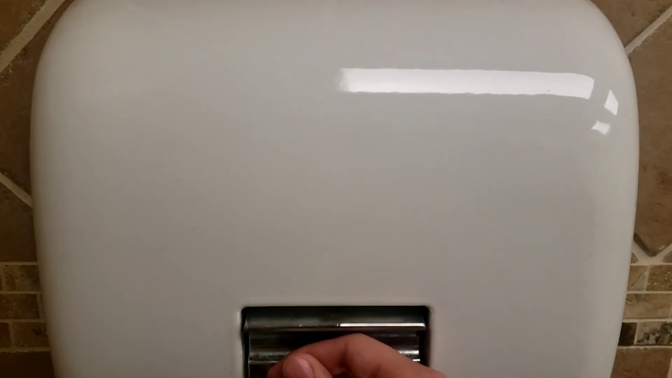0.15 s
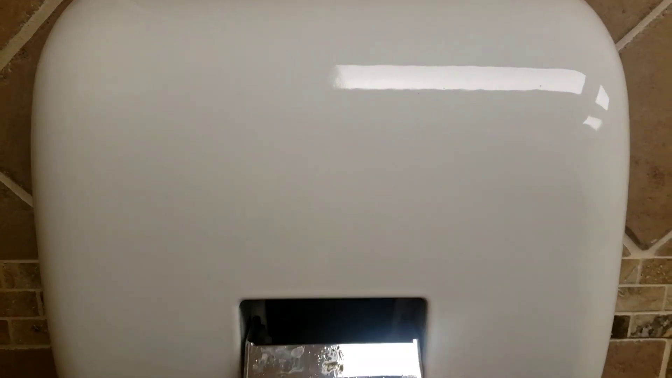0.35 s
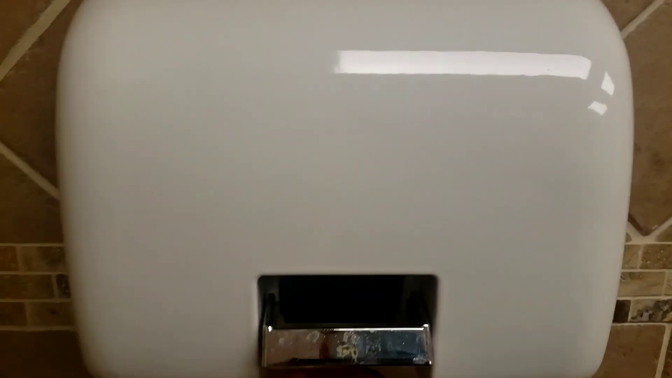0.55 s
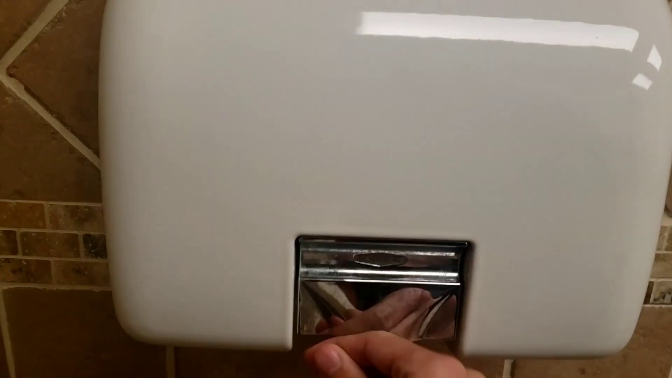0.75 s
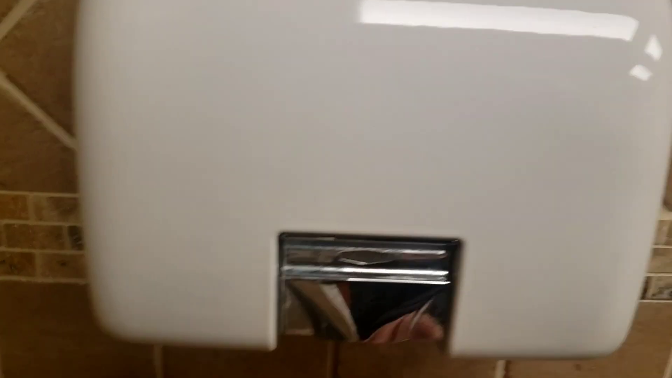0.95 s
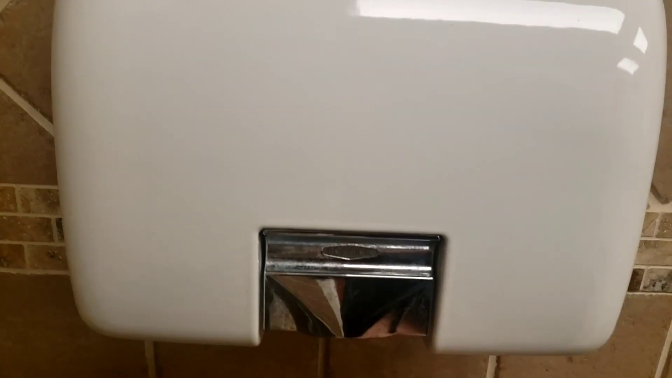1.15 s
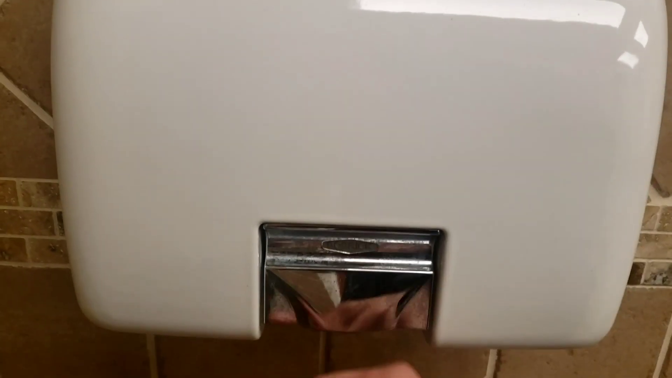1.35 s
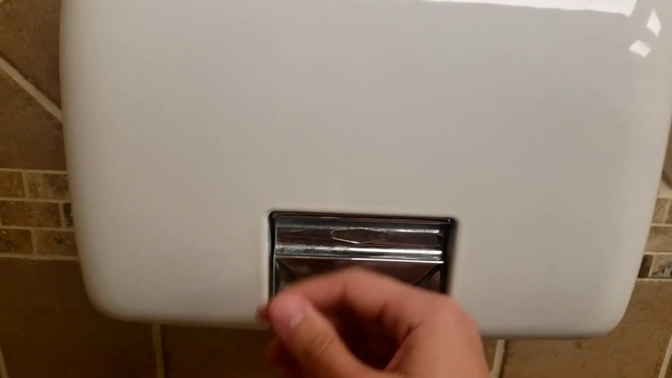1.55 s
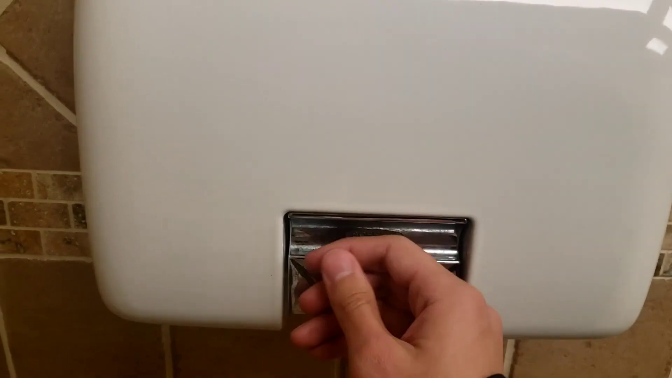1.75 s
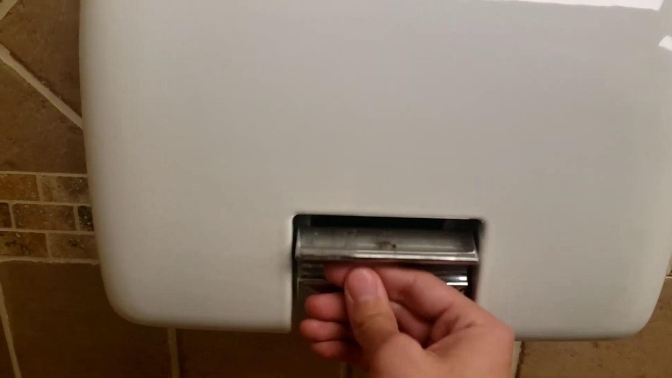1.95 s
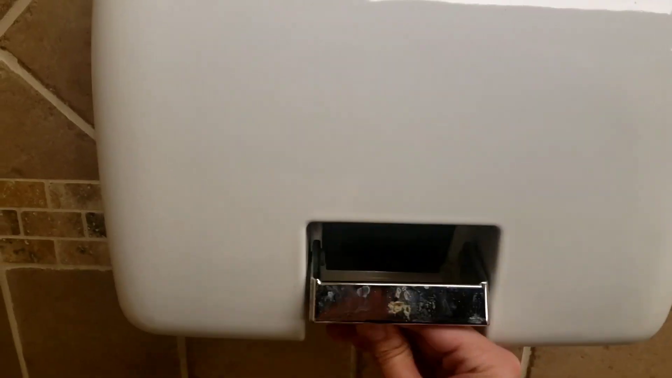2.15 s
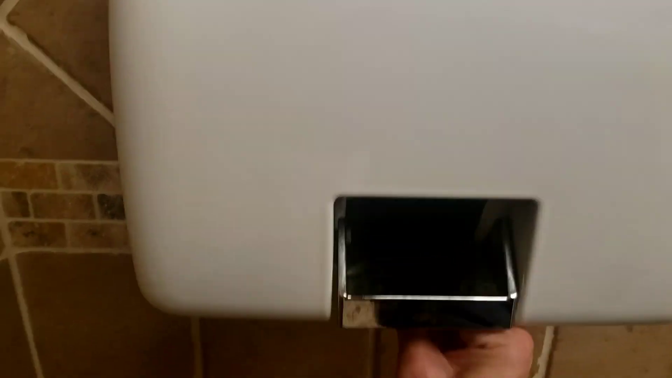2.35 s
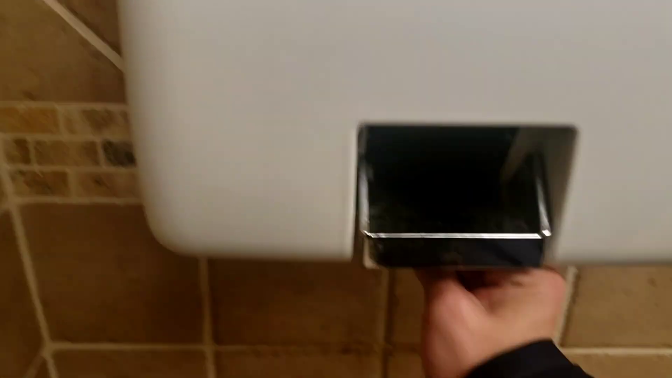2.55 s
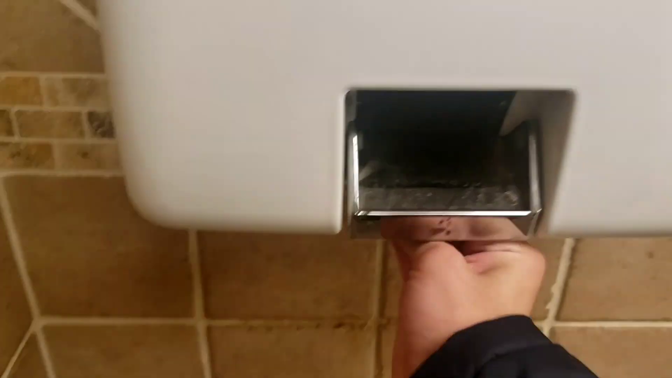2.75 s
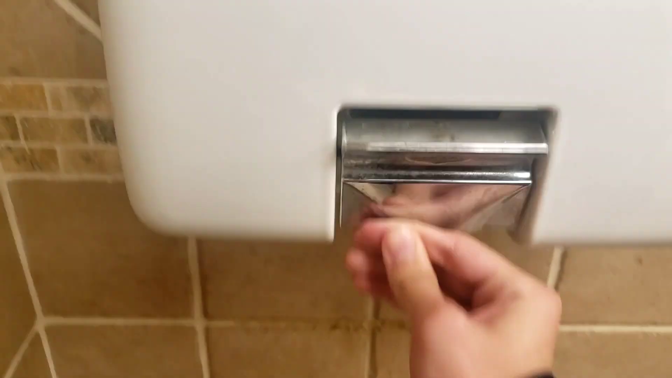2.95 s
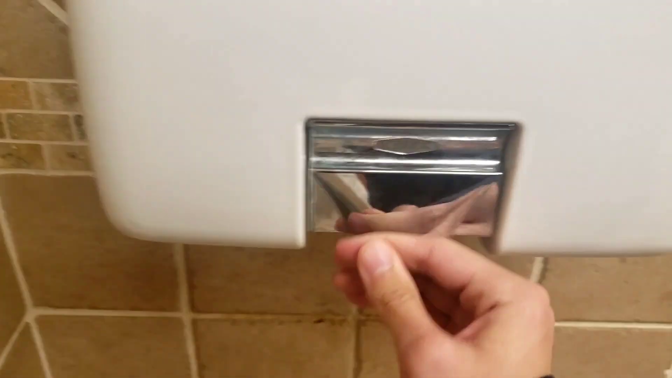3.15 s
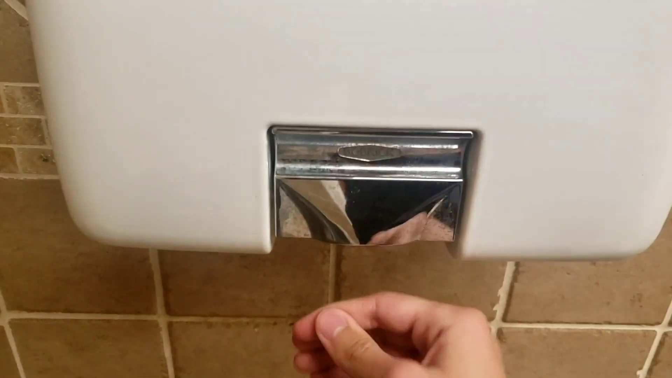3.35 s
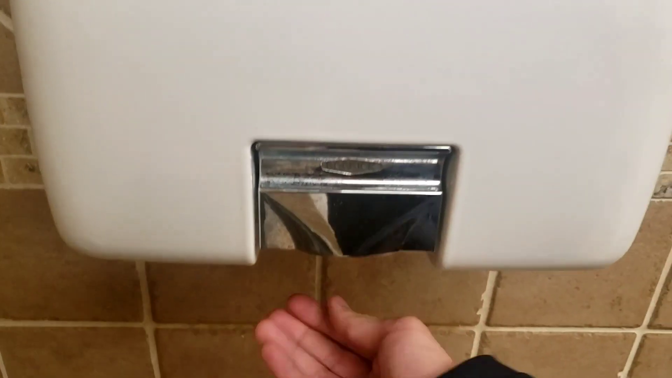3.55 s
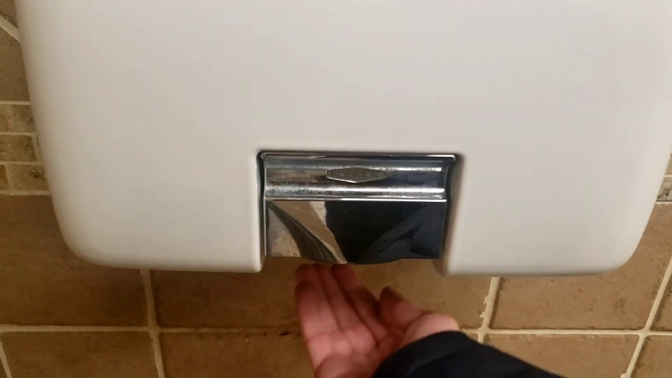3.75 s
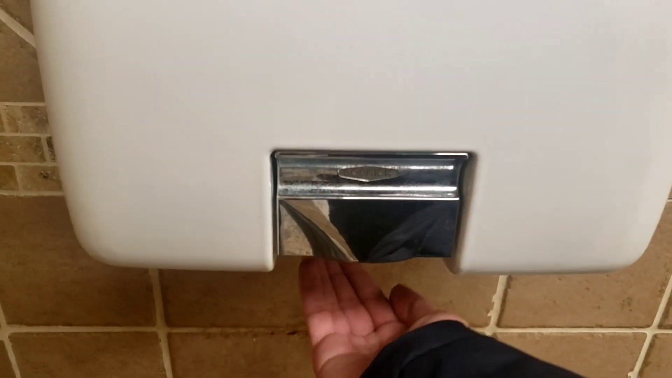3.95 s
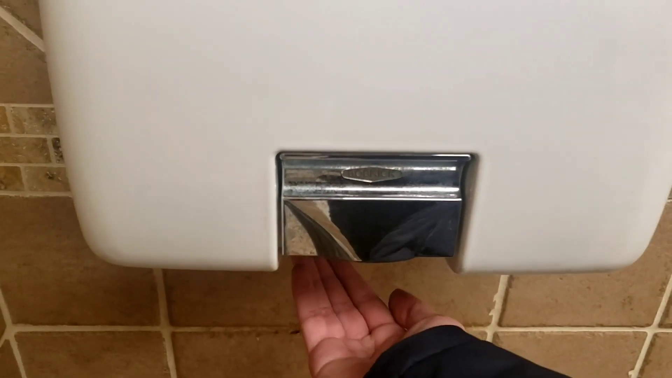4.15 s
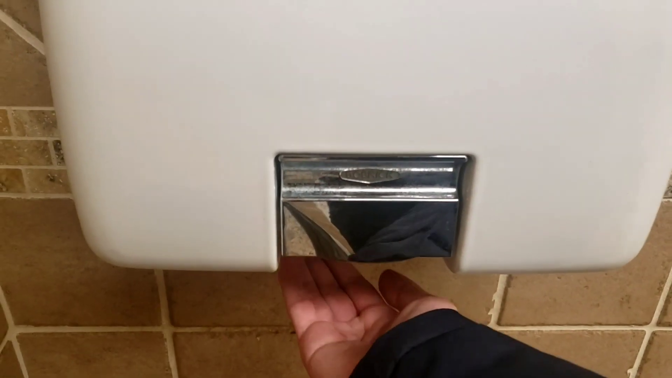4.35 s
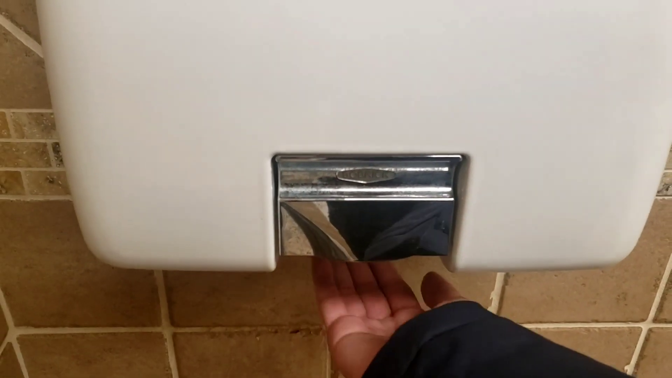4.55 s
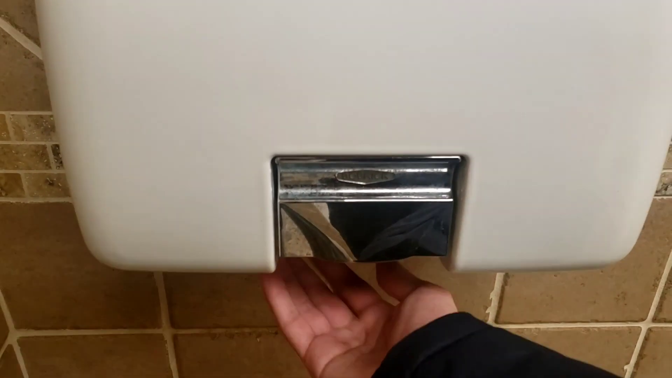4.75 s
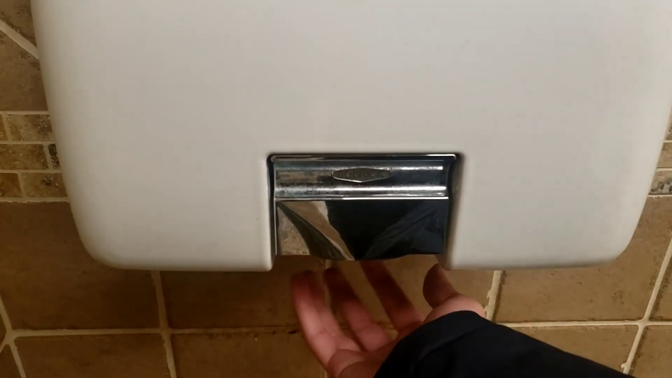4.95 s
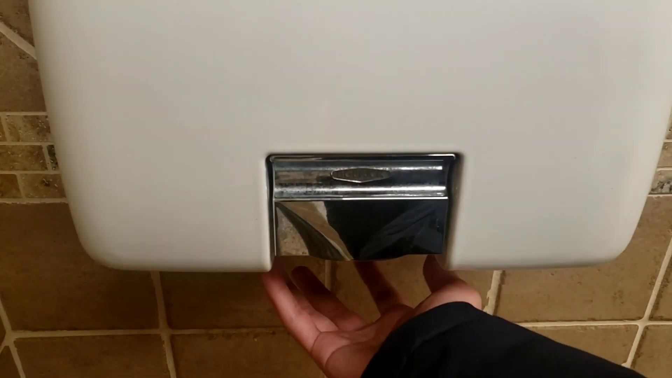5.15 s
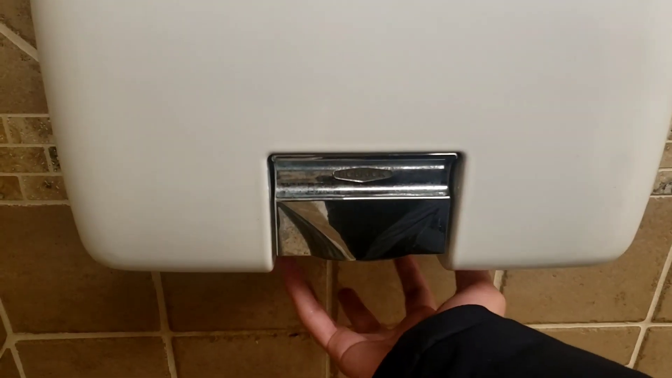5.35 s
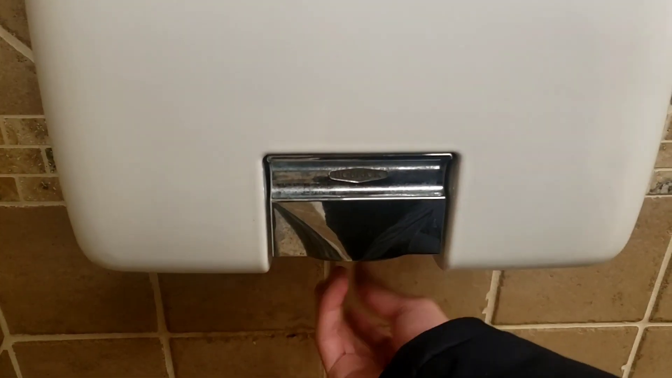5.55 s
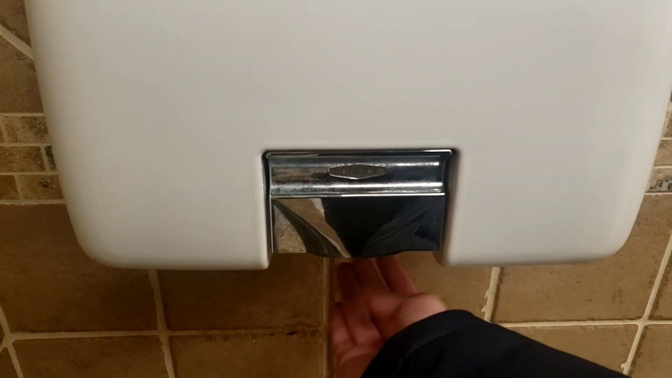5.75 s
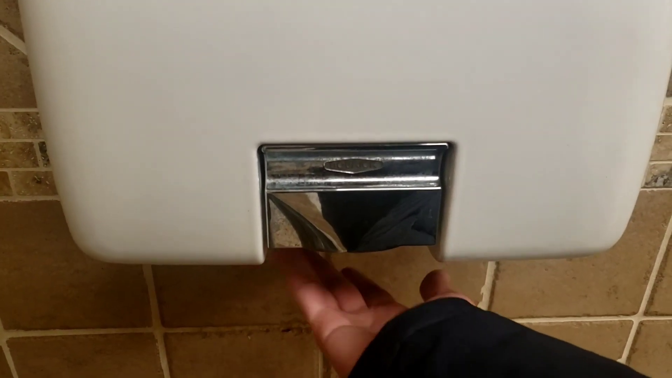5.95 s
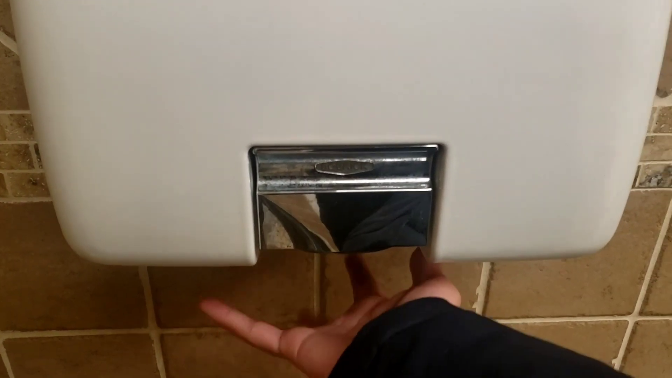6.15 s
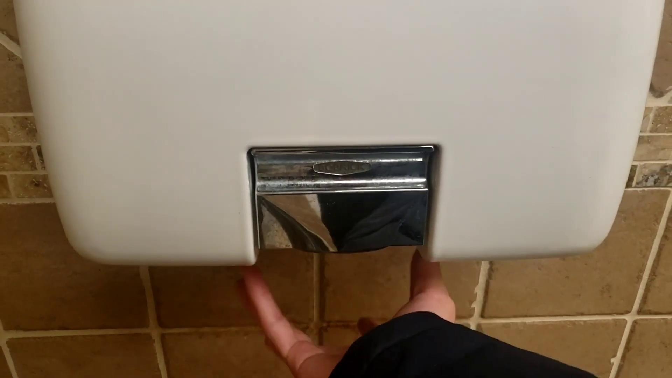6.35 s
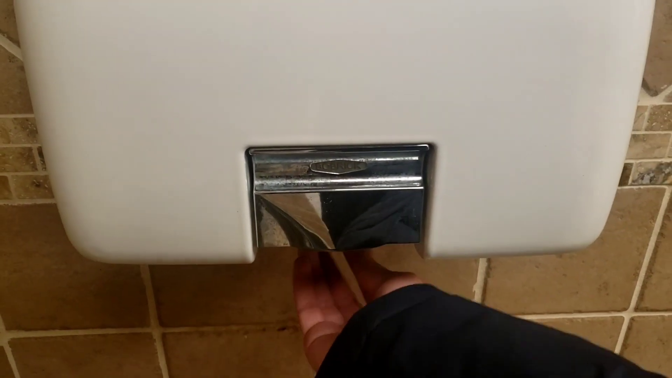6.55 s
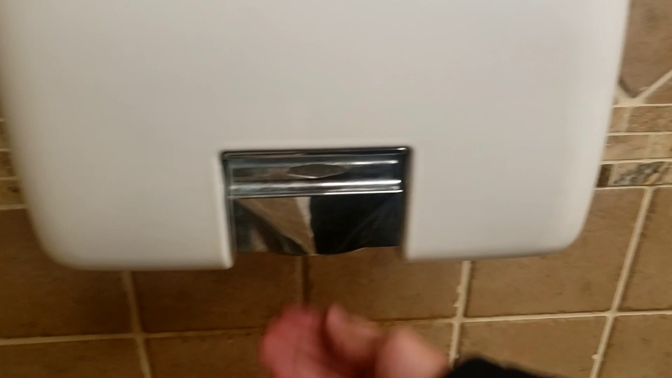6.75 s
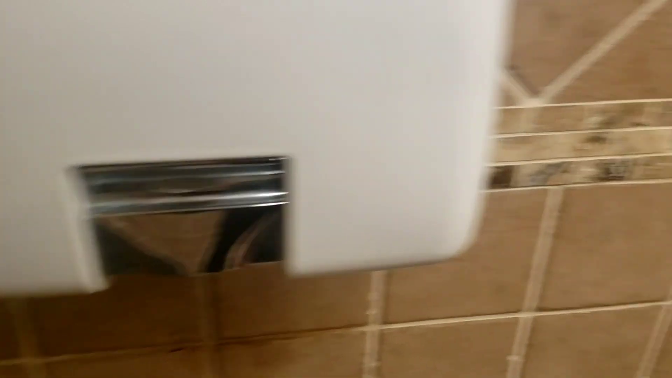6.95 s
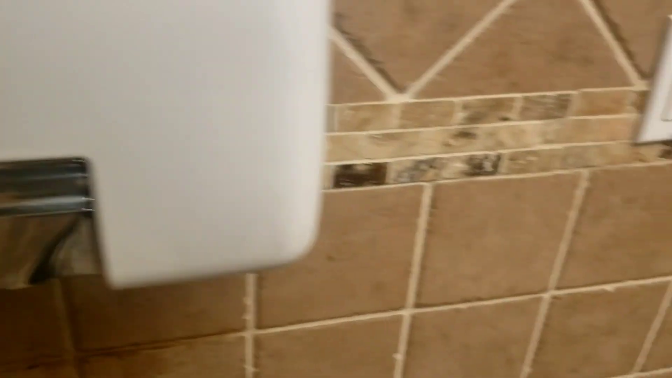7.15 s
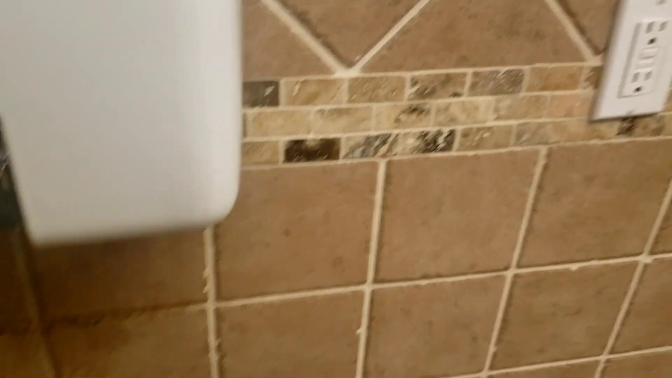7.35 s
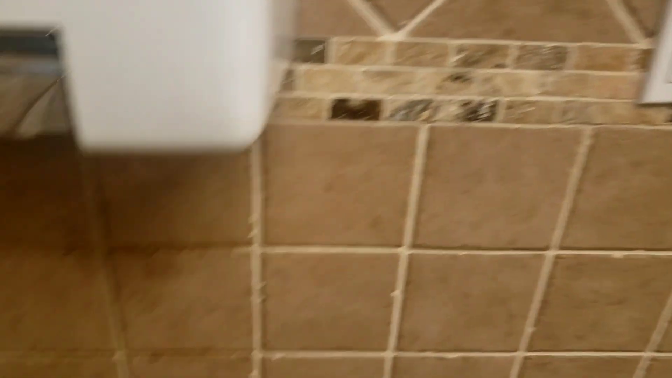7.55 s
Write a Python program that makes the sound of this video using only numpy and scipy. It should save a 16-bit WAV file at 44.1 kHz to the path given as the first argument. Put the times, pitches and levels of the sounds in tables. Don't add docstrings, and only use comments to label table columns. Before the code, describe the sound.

Close to a wall dryer in a small tiled restroom, a hand rubs and thumps the hollow cover. A dry hinge chirps, a metal flap slams and rings briefly, then lighter ticks and a clack follow. The motor starts with a growling hum, the fan climbs quickly, and a loud broad air roar holds, slightly changed as a hand enters the jet.

```python
import sys
import numpy as np
from scipy import signal
from scipy.fft import rfft, irfft, next_fast_len
from scipy.io import wavfile
from scipy.ndimage import map_coordinates

SR = 44100
rng = np.random.default_rng(int(sys.argv[2]) if len(sys.argv) > 2 else 0)


def level_to_linear(level):
    exponent = np.asarray(level, float) / 20
    return 10 ** exponent


def dump(signal):
    limited = np.clip(np.atleast_2d(signal).T, -1, 1)
    pcm = np.round(limited * 32767).astype(np.int16)
    wavfile.write(sys.argv[1], SR, pcm)


N = 335601
TIME = np.arange(N) / SR

MOTOR_ON_S, GRIP_S = 2.654, 2.659
# t/s, level/dB, rattle/s, clatter t60/s, brightness per range/dB
BLOWS = [
    (0.5198, -55.5, .012, 0.17, 9.5),
    (0.661, -67, 0.027, 0.055, -9.5),
    (0.8703, -29.5, 0.025, 0.14, 2.2),
    (1.487, -72.5, 0.033, 0.12, -0.5),
    (2.2174, -60.5, 0.0065, 0.093, 11.5),
    (2.3577, -42.5, 0.0067, 0.15, 8),
    (2.427, -62, 0.034, 0.14, -12.5),
    (2.657, -73.5, 0.0067, 0.056, 9),
    (3.224, -41.5, 0.0074, 0.12, -3),
]
# f/Hz, left over right/dB
FLAP_LEAN = [(60, 1), (110, 3), (200, -1), (380, -2), (700, 1.5), (1290, 5), (2380, 1.5), (4400, 6),
             (8120, 2), (15000, 9)]
# f/Hz, left over right/dB
BLOWER_LEAN = [(60, 2), (250, -0.5), (310, 0.5), (420, 3), (500, -17), (600, 0), (800, -1.5), (950, 4.5),
               (1300, 5), (1800, 3), (3000, 4), (4300, 3.5), (7000, 10.5), (14000, 11.5)]


def in_time(rows):
    s, *columns = np.transpose(rows)
    return [np.interp(TIME, s, c) for c in columns]


def at_hz(points, hz):
    return np.interp(np.log(hz), np.log(np.array(points)[:, 0]), np.array(points)[:, 1])


def sides(lean, hz):
    left = level_to_linear(at_hz(lean, hz))
    return np.array([2 * left, 2 + 0 * left]) / (1 + left)


def drift(rate):
    knots = rng.standard_normal(400)
    return map_coordinates(knots, [TIME * rate % 399], order=3)


def fade(start, t60):
    return (TIME >= start) * level_to_linear(-60 * np.maximum(TIME - start, 0) / t60)


def stroke(start, rise, hold, t60):
    attack = (TIME >= start) * (1 - fade(start, rise))
    return attack * np.where(TIME < start + hold, 1, fade(start + hold, t60))


def ranges(spectrum, edges, lean, modes=()):
    # f/Hz, likeness 0-1
    likeness = [(30, .5), (60, .88), (90, .97), (350, .96), (400, .7), (460, .9), (540, .5), (700, .85),
                (1000, .85), (1400, .65), (2000, .35), (2700, .4), (3200, .15), (9000, .1)]
    # f/Hz, phase/rad
    lead = [(200, 0), (380, .6), (500, .35), (700, .5), (900, 1.3), (1200, 1.0), (1500, .2), (1800, -2.5),
            (2150, .2), (2900, .8), (3500, 1.8)]
    size = next_fast_len(N)
    hz = np.maximum(np.fft.rfftfreq(size, 1 / SR), 1)
    peaks_db = sum(db / (1 + (2 * (hz - f) / width) ** 2) for f, width, db in modes)
    shape_db = at_hz(spectrum[:-1], hz) + peaks_db
    alike = np.clip(at_hz(likeness, hz), 0, 1)
    mid, side = rfft(rng.standard_normal((2, size)))
    pair = np.sqrt(1 + alike) * mid + np.sqrt(1 - alike) * side * [[1], [-1]]
    pair = pair * level_to_linear(shape_db) * sides(lean, hz)
    pair = pair * np.exp(.5j * at_hz(lead, hz) * [[1], [-1]])
    below = [0] + [1 / (1 + (hz / edge) ** 12) for edge in edges] + [1]
    layers = []
    for lower, upper in zip(below, below[1:]):
        layers.append(irfft(pair * np.sqrt(upper - lower), size)[:, :N])
    return [x / np.std(x.mean(axis=0)) for x in layers]


def ring(clicks, hz, t60):
    r, w = level_to_linear(-60 / (t60 * SR)), 2 * np.pi * hz / SR
    return signal.lfilter([0, np.sin(w)], [1, -2 * r * np.cos(w), r * r], clicks + 1e-18)


def tiles(x, wet_db):
    tail = rng.standard_normal((2, SR // 2)) * fade(0.028, 0.27)[:SR // 2]
    tail /= np.sqrt(np.sum(tail ** 2, axis=1, keepdims=True))
    return x + level_to_linear(wet_db) * signal.fftconvolve(x, tail, axes=1)[:, :N]


def fan_speed():
    run_up_s, knee = 0.86, 16
    x = np.maximum(TIME - MOTOR_ON_S, 0) / run_up_s
    return x / (1 + x ** knee) ** (1 / knee)


def blower():
    # f/Hz, level per Hz/dB
    air_colour = [(15, -63), (25, -24.5), (81, -15.5), (194, -6), (233, 0.5), (357, -3.5), (532, -13),
                  (906, -13), (981, -14), (1500, -18), (1860, -27), (2070, -26.5), (9410, -29.5),
                  (11600, -28.5), (14400, -30)]
    edges_hz = [135, 650, 1800]
    modes_hz = [94, 120, 148, 171, 238, 305, 357, 440, 477, 600, 666, 763, 960, 1012, 1150, 1302, 1465,
                1580, 2083, 2362, 4000, 7300, 9300]
    # width/Hz, level/dB
    mode_shapes = [(9.03, 11.5), (7.5, 4), (6.85, 1.5), (8.9, 6.5), (25, 6), (12.1, 4.5), (32.8, 8),
                   (20.8, 7), (17.6, 8), (25, 1.5), (27.778, 1.5), (18, 5.5), (36.8, 7.5), (37.8, 7.5),
                   (41.667, 7), (39.9, 6.5), (35, 3), (37.037, 0), (32.2, 6), (25, 1), (454, 2.5), (700, 4),
                   (1620, -3.5)]
    air_layers = [
        (-41.5, 0.52, 8, -5.5, 2.5),
        (-21, 1.44, -2.5, -1.5, 1.5),
        (-32.5, 1.17, 2, -5, -0.03),
        (-29, 1.015, 0.25, -0.5, 0.27),
    ]
    # t/s, share blocked 0-1
    hand_in_jet = [
        (3.45, 0.14),
        (3.72, .99),
        (4.4, 1),
        (4.8, 0.67),
        (5.4, 0.72),
        (6.0, 0.48),
        (6.6, 0.83),
        (7.0, 0.7),
    ]
    modes = [(hz, *shape) for hz, shape in zip(modes_hz, mode_shapes)]
    layers = ranges(air_colour, edges_hz, BLOWER_LEAN, modes)
    speed, blocked = fan_speed(), in_time(hand_in_jet)[0]
    away = np.clip((TIME - 6.78) / 0.39, 0, 1)
    air = 0
    for x, (db, power, hand_db, away_db, flutter_db) in zip(layers, air_layers):
        level_db = db + hand_db * blocked + away_db * away + flutter_db * drift(15.0)
        air = air + x * speed ** power * level_to_linear(level_db)
    return air


def growl():
    # f/Hz, level per Hz/dB
    growl_colour = [(280, -38), (350, 6), (390, 11), (480, 9), (570, 6), (640, -5), (800, -13), (1450, -15),
                    (1800, -40), (2100, -80), (2200, -80)]
    shake = level_to_linear(-42) * stroke(GRIP_S, rise=.12, hold=.24, t60=.6)
    jolt = level_to_linear(-36) * stroke(2.685, rise=0.035, hold=0, t60=0.41)
    return ranges(growl_colour, [], BLOWER_LEAN)[0] * (shake + jolt)


def hum():
    hum_orders = [(1, 3.5, -8.5), (1.452, -3, 3.5), (2.002, -4, 4.5), (3.098, -17, 1), (3.999, -8, 0),
                  (4.75, -2, -4)]
    hum_hz = 120.85
    running = np.clip((TIME - 2.75) / .45, 0, 1)
    tone = 0
    for multiple, start_db, run_db in hum_orders:
        level_db = start_db + (run_db - start_db) * running + 2.7 * drift(22.0)
        phase = 2 * np.pi * multiple * hum_hz * TIME + 0.34 * multiple * drift(25.0)
        tone = tone + level_to_linear(level_db) * np.sin(phase)
    inrush = level_to_linear(-41) * stroke(GRIP_S, rise=0.5, hold=0, t60=5.3)
    load = level_to_linear(-45.5) * np.clip((TIME - MOTOR_ON_S) / 1.34, 0, 1) ** 2
    return np.sqrt(2) * (inrush + load) * tone


def clatter():
    # f/Hz, level per Hz/dB
    slam_colour = [(150, -46.5), (250, -19), (296, -24.5), (339, 2.5), (389, -29.5), (453, 0.5), (753, -27),
                   (988, -0.5), (1560, -18), (2310, -2.5), (3240, -16.5), (5480, -18), (14400, -25)]
    # f/Hz, level per Hz/dB
    clack_colour = [(150, -30.5), (250, -11), (669, -13.5), (1060, -0.5), (1530, -19), (2010, -1),
                    (2870, -7), (3180, -7.5), (4470, -17), (6380, -6), (8510, -17.5), (11400, 3.5),
                    (14400, -8)]
    edges_hz = [1200, 3500, 8000]
    room_t60_s = [0.27, 0.43, 0.47, 0.18]
    out, hardest = 0, max(row[1] for row in BLOWS)
    for spectrum, shut, tail_db in ((slam_colour, True, -2.5), (clack_colour, False, -14.5)):
        for k, x in enumerate(ranges(spectrum, edges_hz, FLAP_LEAN)):
            shape = 0
            for s, level_db, rattle, t60, bright_db in BLOWS:
                if shut != (level_db == hardest):
                    continue
                tilt_db = bright_db * (k - 1.5)
                direct = (TIME >= s) * (TIME < s + rattle) + fade(s + rattle, t60)
                crack = level_to_linear(7 + min(bright_db, 0)) * fade(s, 0.012)
                direct = direct + (k > 0) * crack
                tail = (1 - fade(s, 0.12)) * fade(s, room_t60_s[k])
                shape = shape + level_to_linear(level_db + tilt_db) * (direct + level_to_linear(tail_db - .4 * tilt_db) * tail)
            out = out + x * shape
    return out


def flap():
    # f/Hz, level/dB, t60/s
    shut_modes = [(450, -14, .2), (1040, 2.5, 0.13), (1700, -16, 0.25), (1303, -4.5, 0.1),
                  (2410, -12.5, .1), (2640, -11, .1), (2920, -14, .15), (4100, -15, .15), (5370, -3.5, .1),
                  (5800, -14.5, .1), (6110, -4.5, .1), (6050, -7.5, .1), (8200, -13.5, .25),
                  (10050, -12.5, .15)]
    # f/Hz, level/dB, t60/s
    open_modes = [(866, -6.5, 0.13), (1090, -5, .1), (1301, -8.5, 0.123), (2005, 1.5, .1), (2385, -8, 0.1),
                  (2740, -13, .1), (2890, -5, 0.2), (3520, -4.5, .06), (4160, -3, 0.04), (6330, -14.5, .06)]
    # f/Hz, level/dB, t60/s
    long_rings = [(1640, -69.5, 1.7), (5700, -48, 0.055), (2060, -60, 0.37), (172.3, -38, 0.33),
                  (2860, -59.5, .25), (1620, -61.5, .5), (339, -26, 0.52), (1680, -51, .7),
                  (1730, -48.5, 1.37), (4700, -53.5, .9), (1370, -48.5, .7), (90, -49, 0.34),
                  (657, -53.5, 0.18), (1658, -53, 0.7), (172, -35.5, 0.44), (1728, -78, 1.2),
                  (1730, -80, .8)]
    long_rings_s = [0, .285, .315, .535, .62, .663, .878, .878, .878, .878, .878, .95, 1.485, 2.36, 2.43,
                    1.49, 1.64]
    out, span = np.zeros((2, N)), 4 * SR
    hardest = max(row[1] for row in BLOWS)
    for modes, shut in ((shut_modes, True), (open_modes, False)):
        chatter = sum(level_to_linear(db) * fade(s, t60 + 2 * rattle)[:span]
                      for s, db, rattle, t60, _ in BLOWS if shut == (db == hardest))
        for hz, mode_db, t60 in modes:
            contacts = chatter * rng.standard_normal((2, span)) * level_to_linear(-15.5 + mode_db)
            out[:, :span] += ring(contacts, hz, t60) * sides(FLAP_LEAN, hz)[:, None]
    for s, (hz, level_db, t60) in zip(long_rings_s, long_rings):
        phase = 2 * np.pi * hz * TIME + .5 * drift(30.0) + rng.random((2, 1))
        envelope = (1 - fade(s, 0.02)) * fade(s, t60)
        level = level_to_linear(level_db + 1.5 * drift(31.0))
        out += level * envelope * np.sin(phase) * sides(FLAP_LEAN, hz)[:, None]
    return out


def squeak():
    # t/s, slip rate f/Hz, level/dB
    slips = [(.778, 1040, -71.5), (.787, 987, -50), (.798, 1018, -38), (.805, 896, -35), (.815, 958, -37),
             (.83, 962, -39.5), (.845, 933, -51.5), (.858, 1000, -46.5), (.868, 1000, -65)]
    start, end = slips[0][0], slips[-1][0]
    hz, level_db = in_time(slips)
    sharp_db = -9 + 2.2 * (level_db + 38) - 18 * fade(start, 0.06 * 3)
    phase = 2 * np.pi * np.cumsum(hz * (1 + 0.0059 * drift(150.0))) / SR
    tone = 0
    for k in range(5):
        overtone_db = k * sharp_db + 11.0 * (k >= 2) + 1.6 * drift(170.0)
        tone = tone + level_to_linear(overtone_db) * np.sin((k + 1) * phase)
    on = (TIME > start) * (TIME < end)
    return np.sqrt(2) * level_to_linear(level_db) * tone * on * sides(FLAP_LEAN, 1000)[:, None]


def hand():
    # f/Hz, level per Hz/dB
    rub_colour = [(12, -43), (20, 4.5), (171, -4.5), (266, -8), (515, -14.5), (642, -23), (1020, -21),
                  (1390, -29), (2920, -34.5), (14400, -40)]
    edges_hz = [135, 650, 2500]
    # f/Hz, width/Hz, level/dB
    cover_modes = [(88, 20, 11), (170.8, 22, 11.5), (339, 6.5, 15), (431.6, 19, 8.5), (526, 16, 11.5),
                   (680, 40, -0.5), (1000, 120, 5.5), (2018, 64, 7), (2750, 210, 3.5), (9050, 1100, -2.5)]
    # t/s, length/s, knock level/dB, thump above knock/dB
    presses = [(-.05, 0.14, -63, 8), (0.122, 0.14, -45, -11), (0.278, 0.17, -51.5, 3),
               (0.517, 0.046, -40.5, -2), (0.59, 0.22, -50, 1.5), (0.883, 0.029, -37, -5),
               (0.94, 0.085, -52.5, 7), (1.472, 0.041, -52.5, 3), (1.539, 0.073, -71, 20),
               (1.897, 0.24, -62.5, -6), (2.137, 0.027, -63, -13), (2.217, .05, -59, -11),
               (2.342, 0.058, -46.5, -11), (2.398, 0.1, -45, -13), (2.58, .06, -63.5, 5)]
    # t/s, length/s, rustle level/dB, rub above rustle/dB
    brushes = [(-.1, 0.18, -65.5, -14), (.06, 0.077, -60.5, -7), (0.206, 0.41, -61, -4.5),
               (0.534, 0.078, -57.5, 2.5), (0.69, 0.14, -61.5, -3.5), (0.772, .08, -49.5, -3),
               (.94, 0.048, -54.5, 4), (1.1, 0.11, -74, -6), (1.3, 0.18, -76.5, -4), (1.482, 0.057, -71, 4),
               (1.887, .13, -67, -7.5), (2.051, .08, -77, -3), (2.13, 0.073, -63.5, -5),
               (2.23, 0.17, -61.5, -8), (2.397, 0.09, -65.5, 9.5)]
    layers = ranges(rub_colour, edges_hz, FLAP_LEAN, cover_modes)
    grip = drift(28.0)
    thump, knock, skin, sleeve = [x * level_to_linear(grip + 0.68 * drift(35.0)) for x in layers]
    out = level_to_linear(-78.5) * (knock + 1.8 * thump) * (TIME < MOTOR_ON_S)
    for s, length, db, thump_db in presses:
        push = level_to_linear(db) * stroke(s, .07, length, 0.32)
        out = out + push * (knock + level_to_linear(thump_db) * thump)
    for s, length, db, rub_db in brushes:
        sweep = level_to_linear(db) * stroke(s, 0.23, length, .4)
        out = out + sweep * (sleeve + level_to_linear(rub_db) * skin)
    return out


def room():
    # f/Hz, level per Hz/dB
    quiet_colour = [(12, -28.5), (20, -13), (120, -6), (186, -12.5), (642, -32.5), (1430, -47),
                    (1730, -21.5), (1980, -46.5), (14400, -51)]
    # f/Hz, level/dB
    mains_tones = [(59.5, -59), (119.5, -67)]
    mains = 0
    for hz, db in mains_tones:
        mains = mains + level_to_linear(db + 1.5 * drift(9.4)) * np.sqrt(2) * np.sin(2 * np.pi * hz * TIME)
    return level_to_linear(-63.5) * ranges(quiet_colour, [], FLAP_LEAN)[0] + mains


def scene():
    metal = tiles(squeak(), wet_db=-2.5) + flap()
    return blower() + growl() + hum() + clatter() + metal + hand() + room()


def band_limit(x):
    return signal.sosfilt(signal.butter(12, 15840, fs=SR, output="sos"), x)


def record(dry):
    bass_cut = signal.butter(2, 30, "high", fs=SR, output="sos")
    top_cut = signal.ellip(16, .5, 90, 14520, fs=SR, output="sos")
    mix = signal.sosfilt(top_cut, signal.sosfilt(bass_cut, dry))
    return band_limit(mix)


dry = scene()
out = record(dry)
dump(out)
```